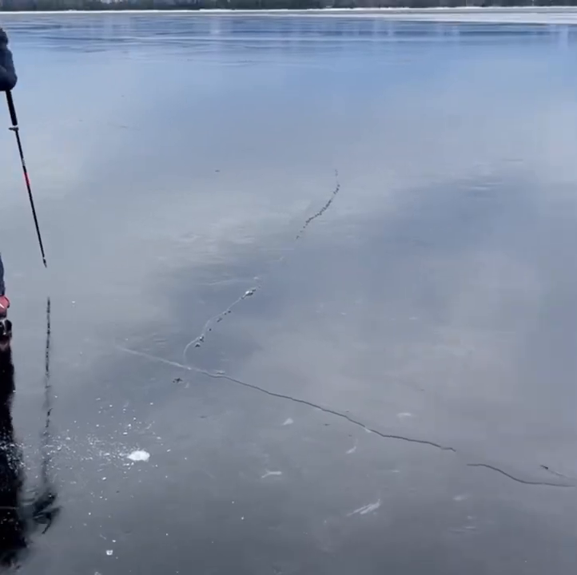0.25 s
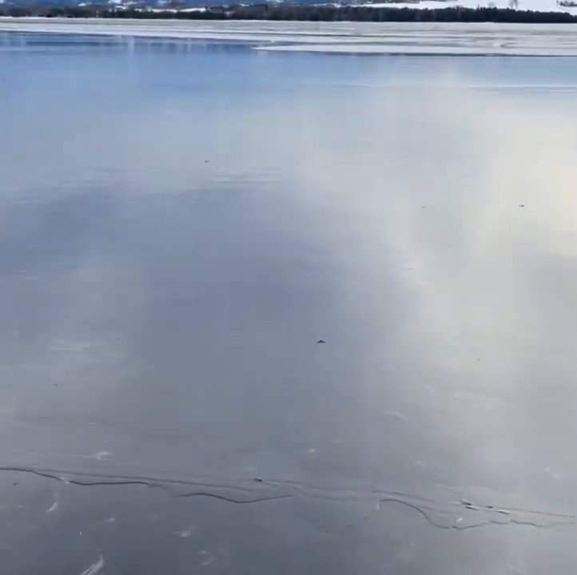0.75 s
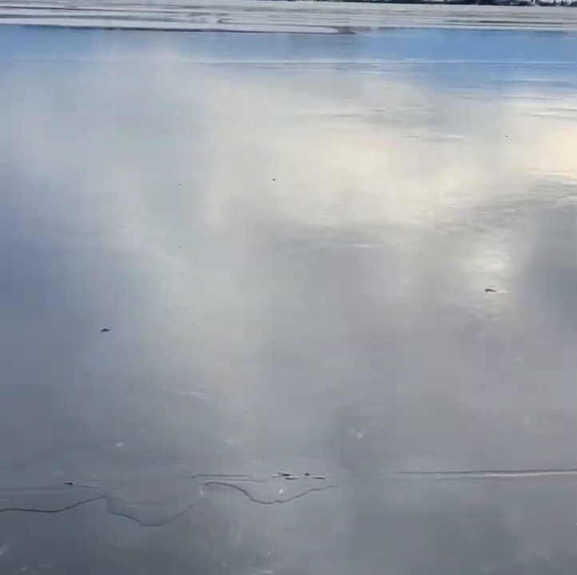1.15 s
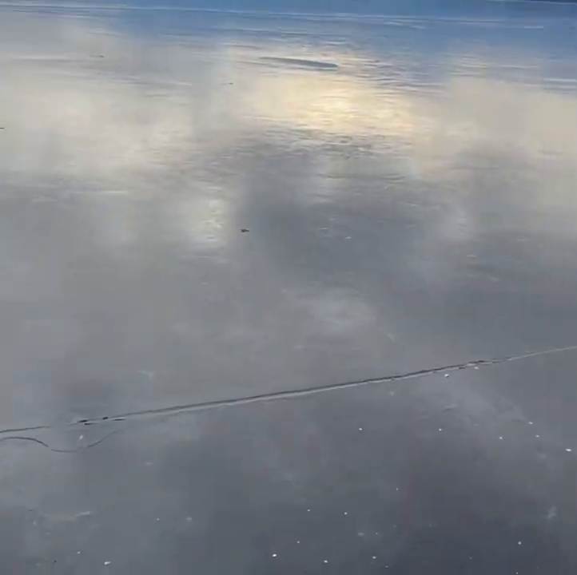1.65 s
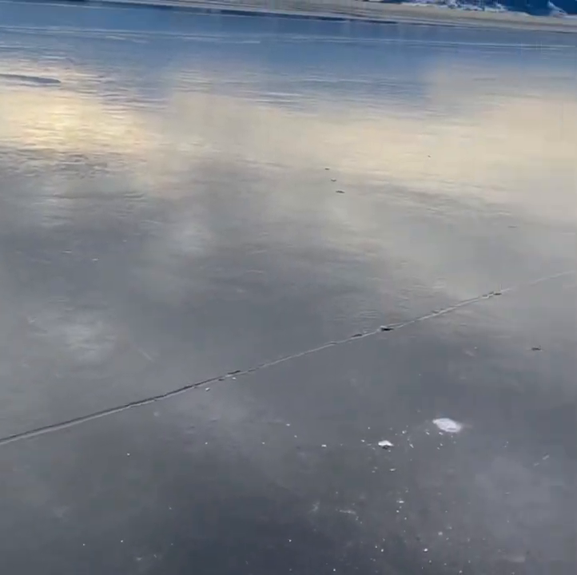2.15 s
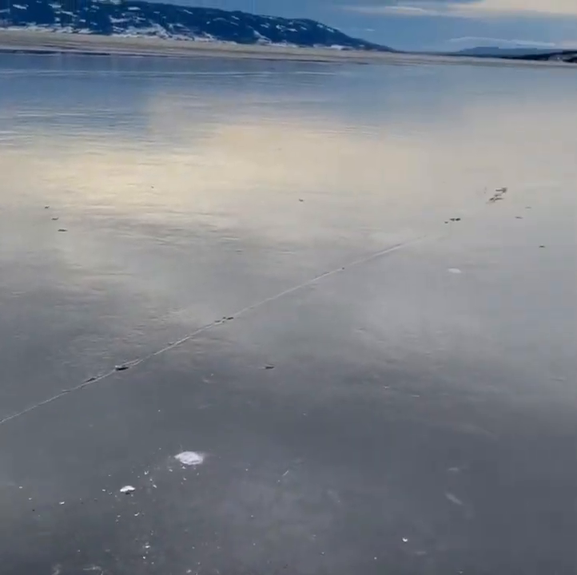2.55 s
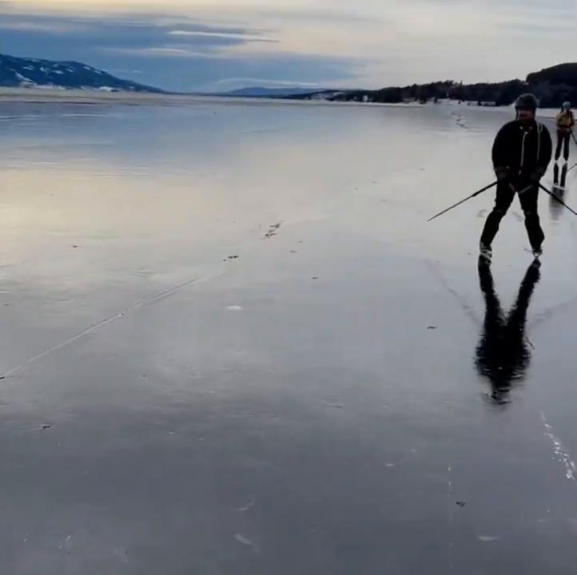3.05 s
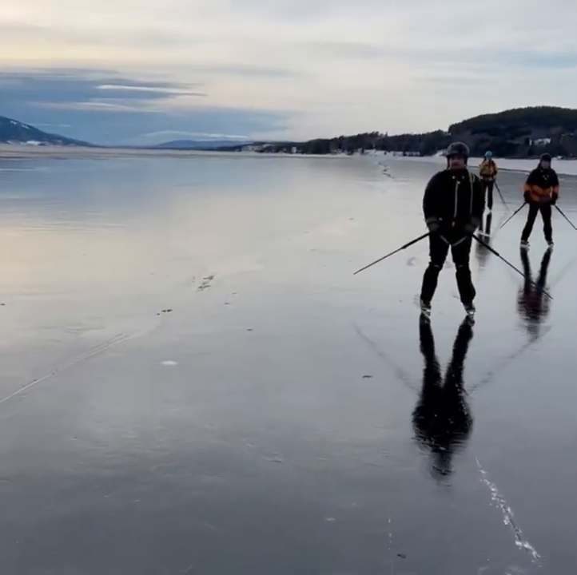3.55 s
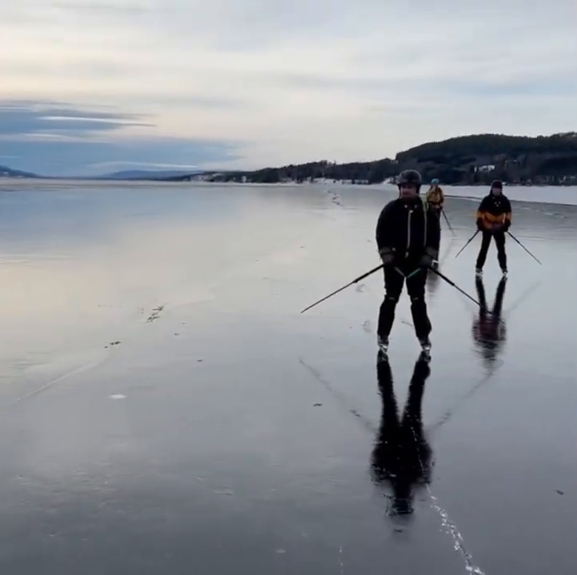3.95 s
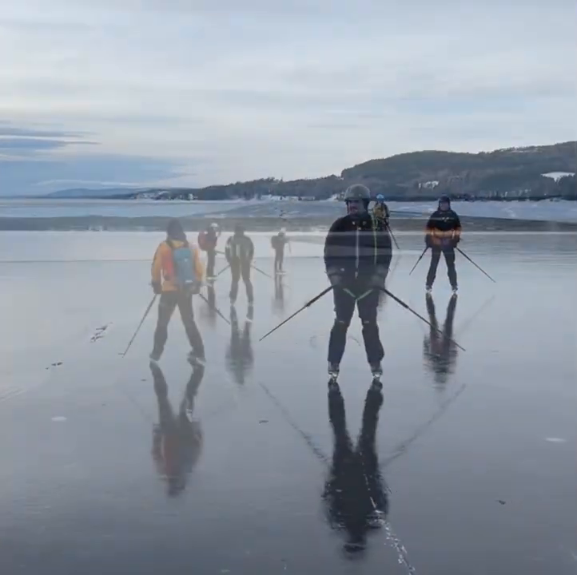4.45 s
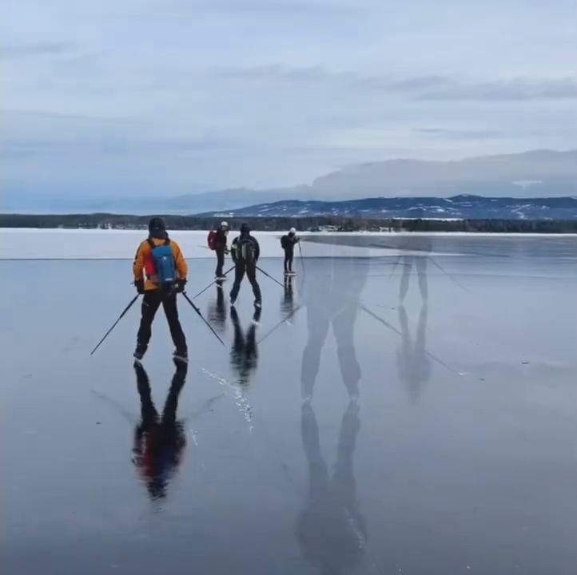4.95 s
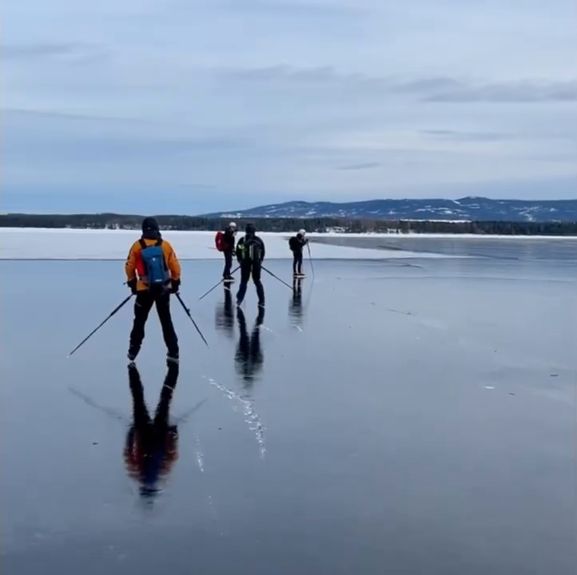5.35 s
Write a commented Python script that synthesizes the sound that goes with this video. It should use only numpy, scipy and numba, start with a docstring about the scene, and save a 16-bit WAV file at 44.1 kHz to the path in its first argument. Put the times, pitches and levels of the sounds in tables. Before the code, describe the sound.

Skates glide over a frozen lake, heard close and dry on a moving phone in open air. From the start a broad, grainy blade hiss sits over a low hum of the ice and soft wind booms around 60 Hz. A hard bright click with a dull knock lands at 0.28 s, smaller ticks at 0.6-0.9 s. Hiss brightens near 1.6 s as scuffs, crackles and a short sagging ring cluster, with a sharp tick at 1.7 s. At 1.91 s a loud crack snaps into a very fast falling chirp with a short crackly tail. A muted double knock follows at 2.35 s. The glide swells around 2.8-3.2 s with a wavering hollow moan near 900 Hz, then drops back and dulls. Wind gusts boom around 3.5-3.8 s; a faint click comes at 4.4 s. From there to 5.6 s, fluttering low thumps and deeper wind booms dominate a thin hiss.

```python
"""Wind booms while skate blades hiss and hum over lake ice; soon clicks and cracks cut through.
Noise in fixed and moving resonances makes the hiss, the humming ice sheet and a hollow moan.
Short noise bursts make the clicks, falling chirps the cracks, fading low tones the struck sheet.
Wind booms, buffets and pops on the two microphone ports of a phone carried along by a skater;
the phone's wind reduction makes the lows the same in both channels."""
import sys
import numpy as np
from scipy import signal
from scipy.io import wavfile
from scipy.ndimage import uniform_filter1d
from numba import njit

SR = 44100
rng = np.random.default_rng(int(sys.argv[2]) if len(sys.argv) > 2 else 0)


def transcribe(u):
    """Save the signal u as a 16-bit wav file named by the first command-line argument.

    u: samples, shape (n,) or (channels, n), limited to [-1, 1]; the rate is SR.
    q: integer samples, one column per channel.
    """
    v = np.clip(np.atleast_2d(u).T, -1, 1)
    q = np.round(v * 32767).astype(np.int16)
    wavfile.write(sys.argv[1], SR, q)


N = 246959
PORT_LAG_S = .00003  # the left port hears shared hiss and clicks this much late, to the nearest sample

# How hard the blades work the ice. Each row: time in seconds, glide hiss level in dB,
# extra brightness in dB, low drone level in dB, hum level of the ice sheet in dB.
BLADE_LEVELS = [(0, -50, -7, -57, -45.5), (.33, -56, 6.5, -55, -44.5), (.55, -51, 2.5, -54, -54),
                (.95, -51, 1, -50, -44), (1.4, -54, 4.5, -51, -47.5), (1.57, -49, 7, -54.5, -44.5),
                (1.73, -54, 5.5, -57, -44.5), (2.2, -56, 4.5, -54.5, -48), (2.55, -59.5, 6, -60, -47),
                (2.65, -54.5, 1, -53.5, -45.5), (2.76, -49.5, -0.5, -50.5, -54.5), (2.9, -51, -8, -54, -54),
                (3.04, -49, -4, -54.5, -59), (3.18, -51.5, -4, -56, -57.5), (3.3, -59, -4.5, -59, -53),
                (3.45, -61.5, -9, -60, -48.5), (3.7, -59, -13, -61, -47), (4.0, -55, -29, -60, -40.5),
                (4.2, -62, -26.5, -65.5, -46), (4.32, -60, -2.5, -57, -43), (4.55, -62, 4, -61, -48),
                (4.78, -56.5, -3, -59, -52.5), (5.05, -56.5, -3, -53, -46), (5.18, -57, -2.5, -52, -50),
                (5.3, -60, -3.5, -67.5, -49.5), (5.45, -59, -12.5, -63, -45), (5.6, -57.5, -14, -65, -37)]
# Below a moving edge the phone's wind reduction makes the lows the same in both channels;
# above it lies a hollow in the sound they share. Each row: time in seconds, edge in Hz,
# hollow depth (a share, before it wanders and is held to 0-1).
EDGE_AND_HOLLOW = [(0, 29.6, 0.03), (2.7, 30, 0.22), (2.93, 30, 0.03), (2.98, 30, 1.1), (3.04, 30, 1.1),
                   (3.06, 30, 0.55), (3.15, 30, .3), (3.38, 31.2, 0.13), (3.52, 59.6, 1), (3.68, 230, 0.5),
                   (3.82, 374, 0.85), (3.94, 490, 0.9), (4.12, 592, 0.05), (4.29, 600, 0), (4.31, 30, 0),
                   (5.6, 30, 0)]


def undb(db):
    """Turn a level in dB into a gain."""
    return 10 ** (np.asarray(db) / 20)


def unit(x):
    """Scale a signal to an rms of 1."""
    return x / np.sqrt(np.mean(x ** 2))


def curves(table):
    """Draw straight lines between the rows of a timed table, one curve per column."""
    s, *columns = np.array(table, float).T
    return [np.interp(np.arange(N) / SR, s, column) for column in columns]


@njit
def svf(x, hz, k):
    """Filter with a moving centre: band and high outputs; a smaller k is narrower."""
    band_out, high_out = np.empty(len(x)), np.empty(len(x))
    b, l = 0., 0.  # memory of the band and low parts
    for i in range(len(x)):
        g = np.tan(np.pi * hz[i] / SR)
        v = (b + g * (x[i] - l)) / (1 + g * (g + k))
        band_out[i] = k * v
        high_out[i] = x[i] - k * v - l - g * v
        b, l = 2 * v - b, l + 2 * g * v
    return band_out, high_out


def band(x, hz, width, order=2):
    """Keep a fixed band around hz, with its edges held in a safe range."""
    edges = [max(hz - width / 2, hz / 8), min(hz + width / 2, .45 * SR)]
    return signal.sosfilt(signal.butter(order, edges, "band", fs=SR, output="sos"), x)


def walk(rate):
    """Wander at random: rate levels per second, smoothed twice, rms 1."""
    k = int(SR / rate)
    steps = np.repeat(rng.standard_normal(N // k + 1), k)
    return unit(uniform_filter1d(uniform_filter1d(steps, k), k)[:N])


def fading(hits, t60):
    """Let every hit die away by 60 dB in t60 seconds."""
    return signal.lfilter([1], [1, -np.exp(-np.log(1000) / (t60 * SR))], hits)


def grains(rate, scatter_db, t60):
    """Envelope of random bursts of uneven size, each dying away."""
    hits = (rng.random(N) < rate / SR) * undb(scatter_db * rng.exponential(1, N))
    return fading(hits, t60)


def pair(hz, width, unalike):
    """Band noise at both ports: a shared part, and a part with opposite signs."""
    same, other = rng.standard_normal((2, N))
    late = np.roll(same, int(round(PORT_LAG_S * SR)))
    return band(np.array([late + unalike * other, same - unalike * other]), hz, width)


def drifting(x, share):
    """Let every pitch wander slowly by reading the sound at an uneven speed."""
    place = np.cumsum(1 + share * walk(7))
    return np.array([np.interp(place * (N - 1) / place[-1], np.arange(N), c) for c in x])


def add(out, s, x):
    """Mix a short sound in at s seconds."""
    i = int(s * SR)
    out[:, i:i + x.shape[-1]] += x[..., :N - i]


def rings(table, glide):
    """Damped tones whose pitch sags: rows of start in s, dB, Hz and t60 in s."""
    out, t = np.zeros((2, N)), np.arange(int(.25 * SR)) / SR
    for s, peak_db, hz, t60 in table:
        turns = hz * t * (1 - glide * np.minimum(t / t60, 1))
        shape = undb(peak_db - 60 * t / t60) * np.minimum(t / 0.0007, 1)
        add(out, s, shape * np.sin(2 * np.pi * turns))
    return out


def blades():
    """Grit under the steel excites resonances of ice and blade; each flickers a little."""
    # Resonances of the humming sheet. Each row: pitch in Hz, width in Hz, relative level in dB.
    hum_modes = [(233, 49, 1), (284, 97, 8), (340.4, 210, -7)]
    # Resonances of each hiss, low to high, then a narrow ring. Each row: pitch in Hz, width in Hz,
    # relative level in dB, how unlike the two ports are (0-1).
    drone_modes = [(900, 200, 0, .3), (1200, 280, 0, .3), (1420, 240, -4, .2)]
    glide_modes = [(1512, 530, -0.5, 0), (1905, 600, -.5, 0), (2358, 525, 1.5, 0.1), (2897, 480, -4.5, 1)]
    scrape_modes = [(3710, 770, -1.5, 0.23), (4634, 730, -3, 0.1425), (5390, 690, -3.5, 0.5),
                    (6010, 780, -1.5, 0.39), (7080, 2400, 0, 0.15)]
    sheen_modes = [(8110, 710, -11.5, 0.22), (9650, 1800, -3.5, 0.324), (10580, 1200, -5, 0.2),
                   (14800, 1800, -14.5, 0.36)]
    ring_modes = [(4204, 450, 0, 0.4)]
    # The narrow ring against the glide. Each row: time in seconds, relative level in dB.
    ring_level = [(0, -9), (.4, -8), (.8, -7), (1.1, -4.5), (1.4, -4.5), (2.3, -11.5), (2.7, -16),
                  (3.3, -16.5), (4.2, -24), (5.0, -21), (5.6, -22)]
    # Size of the slow pitch wander, a share each for drone, glide, scrape, sheen and ring.
    drifts = .04, .03, 0, 0, .025

    grit = 1 + 0.14 * uniform_filter1d(grains(300, 3.36, 0.0074), size=12)
    glide_db, bright_db, drone_db, hum_db = curves(BLADE_LEVELS)
    scrape_db = glide_db - 4 + 0.36 * bright_db  # follows only part of the brightness
    sheen_db = glide_db - 12.5 + bright_db
    ring_db = glide_db + curves(ring_level)[0]
    levels = drone_db, glide_db, scrape_db, sheen_db, ring_db
    mode_sets = drone_modes, glide_modes, scrape_modes, sheen_modes, ring_modes

    rub = rng.standard_normal(N)
    hum = sum(undb(db + 1.4 * walk(15)) * unit(band(rub, hz, width, order=1))
              for hz, width, db in hum_modes)
    out = undb(hum_db) * unit(band(hum, 268, 310))

    shared = walk(11)  # flicker common to every hiss
    for level_db, modes, drift in zip(levels, mode_sets, drifts):
        hiss = sum(undb(db + 0.67 * shared + 1.9 * walk(20)) * unit(pair(hz, width, unalike))
                   for hz, width, db, unalike in modes)
        if drift:
            hiss = drifting(hiss, drift)
        out = out + undb(level_db) * unit(grit * hiss)
    return out


def faint_tones():
    """Short faint tones at random, slightly sliding pitches give the hiss a grainy, whistling texture."""
    out, t = np.zeros((2, N)), np.arange(int(.1 * SR)) / SR
    drone_db = curves(BLADE_LEVELS)[2]
    per_second = 110
    for when, pitch, size, length, slide, pan in rng.random((int(per_second * N / SR), 6)):
        span = .014 * (.5 + 1.3 * length)  # seconds
        start_hz = 600.5 * 2 ** (3.6 * pitch)  # scattered over 3.6 octaves
        hz = start_hz * (1 + .03 * (2 * slide - 1) * t / span)
        db = drone_db[int(when * N)] + 2.5 - 12 * size - 9 * pitch  # high ones are weaker
        tone = t / span * np.exp(1 - t / span) ** 2 * np.sin(2 * np.pi * np.cumsum(hz) / SR)
        side_db = np.array([[3], [-3]]) * (2 * pan - 0.5)  # leans left more often than right
        add(out, when * N / SR, undb(db + side_db) * tone)
    return out


def moan():
    """Rubbing noise in a narrow blade resonance gives a hollow moan whose pitch wavers."""
    # Each row: time in seconds, pitch in Hz before it wavers, level in dB.
    moan_path = [(2.6, 880, -66), (2.69, 930, -56), (2.738, 860, -49), (2.762, 960, -56), (2.79, 965, -51),
                 (2.848, 940, -53), (2.876, 890, -46), (2.914, 940, -53), (3.055, 865, -58),
                 (3.096, 868, -43), (3.116, 862, -52), (3.14, 860, -44), (3.165, 835, -43),
                 (3.188, 844, -57), (3.214, 818, -55), (3.288, 820, -78)]
    hz, db = curves(moan_path)
    hz = hz * (1 + .025 * walk(20))
    width = .16  # share of the pitch, for each of two passes

    def resonant():
        once = svf(rng.standard_normal(N), hz, width)[0]
        return unit(svf(once, hz, width)[0])

    same, other = resonant(), resonant()
    strength = np.sqrt(uniform_filter1d(same ** 2, size=500))
    same = unit(same / strength ** .6)  # fairly even strength
    return undb(db) * (same + .2 * other * np.array([[1], [-1]]))


def clicks():
    """Lumpy noise bursts, each with a bright part and a duller body."""
    # Clicks and scuffs of steel on ice, and the bright snap and crackles of the crack near 1.91 s.
    # Each row: start in seconds, rough treble peak in dB, treble centre in Hz, rough body peak in dB,
    # left minus right in dB, length before the fade in seconds.
    click_list = [(0.278, -24.5, 3970, -35, 3, 0.0042), (0.2843, -5.5, 7150, -14.5, 1, 0.0075),
                  (0.455, -33, 6040, -40.5, 1.5, .09), (0.469, -32, 4500, -55, 7, .0024),
                  (0.605, -11.5, 7700, -35, 1, 0.0021), (0.641, -17, 7150, -55, 5, 0.00095),
                  (.735, -29, 11100, -55, -2, 0.0021), (.759, -31, 11000, -55, 0, .002),
                  (0.7965, -34, 6600, -38, 0, 0.0047), (.819, -21.5, 5600, -24, -3, 0.0034),
                  (.8916, -25.5, 10400, -37, -2, 0.0052), (1.084, -35, 5560, -41, 0, 0.0065),
                  (1.375, -37, 5500, -58, -2, 0.065), (1.429, -35, 8900, -40, 1, .0044),
                  (1.4543, -32, 7900, -38, 0, 0.004), (1.4955, -31, 1350, -44, 0, .003),
                  (1.539, -33, 2000, -42, 0, .002), (1.512, -36.5, 8200, -53, -1, 0.11),
                  (1.582, -23.5, 9200, -33, 3, 0.011), (1.596, -31, 7100, -35, 1, 0.052),
                  (1.599, -31, 2050, -49, -5, 0.03), (1.61, -33, 6000, -36, -7, 0.0046),
                  (1.643, -29, 2200, -46, 2, .003), (1.632, -29, 2700, -46, 0, .002),
                  (1.654, -29, 2200, -46, 0, .004), (1.664, -25, 2400, -46, -1, .003),
                  (1.7055, -14, 10400, -21.5, -1, 0.0024), (1.711, -39, 2200, -30.5, -1, 0.0074),
                  (1.772, -23.5, 4900, -31, -.5, 0.0074), (1.9083, -13, 6200, -45, 1, 0.002),
                  (1.914, -28, 7200, -56, 0, 0.016), (1.9165, -19, 2600, -45, -2, .0012),
                  (1.9235, -21, 2900, -45, 2, .0015), (1.9295, -25, 2500, -45, -1, .0015),
                  (2.074, -35, 4600, -41, -10, 0.0053), (2.186, -44, 4600, -53, -9, 0.017),
                  (3.988, -55.5, 7900, -45, -1.5, 0.013), (4.4185, -33, 4000, -42, 3, 0.003),
                  (4.42, -40, 4400, -47, 5, 0.024), (4.433, -50, 4400, -39, 3, .005)]
    out, t = np.zeros((2, N)), np.arange(int(.15 * SR)) / SR
    lag = int(round(PORT_LAG_S * SR))
    bright_crest_db, body_crest_db = 13.5, 9.5  # assumed peak over rms
    for s, peak_db, hz, body_db, pan_db, length in click_list:
        t60 = min(0.0091 + 3.5 * length, 0.13)  # seconds; long bursts fade more slowly
        same, left, right, low, crumb = rng.standard_normal((5, len(t)))
        fine_db = 2.12 * unit(uniform_filter1d(crumb, size=80))
        lumps_db = 3 * min(length / .04, 1) * unit(uniform_filter1d(crumb[::-1], size=400))
        swell = np.minimum(t / max(0.0023, .4 * length), 1)
        fade = undb(-60 * np.maximum(t - length, 0) / t60)
        shape = undb(fine_db + lumps_db) * swell * fade

        apart = np.array([left, right])
        width = hz * (0.82 if hz > 4480 else .3)  # lower bursts ring in a narrower band
        bright = unit(band(np.array([np.roll(same, lag), same]) + .6 * apart, hz, width))
        body = unit(band(low + 0.36 * apart, 1000, 2100))
        burst = undb(peak_db - bright_crest_db) * bright + undb(body_db - body_crest_db) * body
        side = undb(np.array([[pan_db], [-pan_db]]) / 2)
        add(out, s, side * shape * burst)
    return out


def crack():
    """Bending waves spread a snap into a falling chirp; scattered waves trail it."""
    # Each row: start in seconds, chirp peak in dB, start pitch in Hz, end pitch in Hz,
    # tail level in dB, time for the tail to fall 60 dB in seconds.
    crack_list = [(1.9089, -2.5, 3150, 700, -24, .07), (.8192, -28, 3600, 1300, -39, .03),
                  (1.5868, -27, 2300, 600, -42, .03)]
    out, t = np.zeros((2, N)), np.arange(int(.2 * SR)) / SR
    sweep_s, swell_s = .0016, .001
    for s, peak_db, start_hz, end_hz, tail_db, t60 in crack_list:
        hz = end_hz + (start_hz - end_hz) * np.exp(-t / sweep_s)
        swell = (t / swell_s * np.exp(1 - t / swell_s)) ** 3
        chirp = swell * np.sin(2 * np.pi * np.cumsum(hz) / SR)
        chirp = np.array([chirp, np.roll(chirp, shift=2)])  # it reaches the left port first

        same, other, crumb = rng.standard_normal((3, len(t)))
        crackle = undb(4 * unit(uniform_filter1d(crumb, size=100)))
        scattered = np.array([same + 0.2 * other, same - 0.33 * other]) * crackle
        tail = unit(band(scattered, 2330, 2200))
        fade = undb(tail_db - 60 * t / t60) * np.minimum(t / 0.00088, 1)
        add(out, s, undb(peak_db) * chirp + fade * tail)
    return out


def blows():
    """Blows ring the same modes of the ice sheet, most near a favoured pitch."""
    # Ways the sheet can ring. Each row: start pitch in Hz, relative level in dB, t60 in seconds.
    sheet_modes = [(164, 0, .06), (253.3, 0.5, 0.11), (376, 0, 0.045), (511, -0.5, 0.052), (692, -6, 0.14),
                   (837, -3, 0.053), (1013, 4.5, 0.011), (1232, 2, 0.032)]
    # Blows on the sheet; the close rows after 1.59 s sustain one sagging ring.
    # Each row: start in seconds, level in dB before the mode's own, pitch that rings most in Hz.
    blow_list = [(0.294, -20.5, 370), (0.296, -30, 169), (1.91, -32.5, 170), (1.5879, -32, 480),
                 (1.5895, -24, 262), (1.5975, -34, 255), (1.6355, -32, 225), (1.604, -26.5, 250),
                 (1.612, -30, 252), (1.627, -32, 225), (1.608, -30.5, 510), (1.9108, -16.5, 905),
                 (1.916, -27, 276), (1.919, -24.5, 1240), (2.328, -35, 252), (2.36, -25, 766),
                 (2.3624, -25, 420), (2.371, -25.5, 466), (2.386, -34, 256)]
    struck = []
    for s, peak_db, near_hz in blow_list:
        for hz, db, t60 in sheet_modes:
            away_db = 33.5 * abs(np.log2(hz / near_hz))  # 33.5 dB weaker per octave away
            struck.append((s, peak_db + db - away_db, hz, t60))
    return rings(struck, glide=0.067)


def wind():
    """Eddies boom on both ports alike; buffets and pops push the two opposite ways."""
    # Wind common to both ports. Each row: time in seconds, boom between gusts in dB,
    # boom pitch in Hz, rustle in dB.
    shared_wind = [(0, -41.5, 59.6, -53), (.9, -53.5, 63.4, -54), (1.45, -51, 65.2, -51),
                   (1.6, -60, 66.2, -54.5), (2.0, -48, 60, -53.5), (2.55, -62, 54.9, -51),
                   (2.75, -50.5, 56.4, -54.5), (3.1, -52.5, 58.7, -58.5), (3.45, -43, 59.7, -61),
                   (3.75, -40, 62, -64), (4.15, -46, 60, -53.5), (4.65, -46, 78, -54),
                   (4.82, -34.5, 83.6, -53.5), (5.05, -35, 83.8, -50), (5.4, -32.5, 79.5, -59.5),
                   (5.6, -32, 79.4, -50)]
    # Wind that differs between the ports, before lulls and filtering. Each row: time in seconds,
    # low buffet in dB, high buffet in dB, pops in dB.
    apart_levels = [(0, -43.5, -56, -56), (.35, -45.5, -64, -62), (.7, -40, -47, -58),
                    (1.1, -44.5, -54.5, -66), (1.7, -51.5, -64, -56), (2.3, -48.5, -57, -63),
                    (2.8, -45.5, -42, -77), (3.3, -45, -42, -68), (3.6, -66, -52, -53.5),
                    (4.0, -67, -62, -49.5), (4.4, -74, -73.5, -61.5), (4.85, -46, -61, -59),
                    (5.2, -59.5, -70, -60), (5.6, -45, -45, -65)]
    # Strong eddies that thump both ports. Each row: start in seconds, tone level in dB, start pitch in Hz.
    thump_list = [(4.425, -29.5, 458), (4.517, -41, 390), (4.599, -27, 366), (4.627, -32, 463),
                  (4.701, -32, 398), (4.735, -38, 331), (4.859, -30, 336), (4.895, -27.5, 420),
                  (4.907, -34, 746), (4.935, -26.5, 447), (4.982, -36, 416), (4.995, -30.5, 382),
                  (5.02, -36, 331), (5.053, -32, 464), (5.071, -35, 331), (5.085, -32, 425),
                  (5.095, -33, 404), (5.127, -38, 799), (5.178, -44, 331), (5.199, -30.5, 360),
                  (5.266, -35, 427), (5.321, -44, 342), (5.35, -34, 369), (5.405, -38, 331),
                  (5.451, -30, 331), (5.484, -27.5, 331), (5.509, -42, 331), (5.534, -33, 330),
                  (5.561, -27, 331), (5.584, -27, 523)]

    calm_db, boom_hz, rustle_db = curves(shared_wind)
    low_db, high_db, pops_db = curves(apart_levels)
    edge_hz = curves(EDGE_AND_HOLLOW)[0]
    noise = rng.standard_normal((4, N))
    rustle = unit(undb(1.2 * walk(25)) * band(noise[1], 540, 360))

    eddies = shedding(27, 0.06)
    low = unit((1.7 + eddies) * band(noise[2], 94, 100))
    high = unit((.9 + eddies) * band(noise[2], 254, 220))
    pops = unit((.25 + eddies) * band(noise[3], 820, 770, order=3))
    lulls = undb(2.5 * walk(9))
    apart = lulls * (undb(low_db) * low + undb(high_db) * high) + undb(pops_db) * pops
    for _ in range(6):  # the phone's wind reduction: little difference is left below the edge
        apart = svf(apart, edge_hz, np.sqrt(2))[1]

    thumps = rings([(s, db, hz, .03) for s, db, hz in thump_list], glide=0.31)
    thumps = thumps + 1.16 * band(thumps * noise[0], 430, 740)  # roughened by noise
    alike = gusts(calm_db) * booming(boom_hz) + undb(rustle_db) * rustle + thumps
    return alike + apart * np.array([[1], [-1]])


def shedding(rate, t60):
    """Envelope of eddies shed at a loosely steady rate per second."""
    turns = np.floor(np.cumsum(rate * (1 + .35 * walk(25))) / SR)
    hits = (np.diff(turns, prepend=0) > 0) * undb(3.4 * rng.standard_normal(N))
    return unit(uniform_filter1d(fading(hits, t60), size=130))


def booming(hz):
    """Big eddies swing the pressure at a wandering pitch, with fairly even strength."""
    swing = svf(svf(rng.standard_normal(N), hz, 0.92)[0], hz, 0.92)[0]
    strength = np.sqrt(uniform_filter1d(swing ** 2, size=1800))
    return unit(band(swing / strength ** 0.76, 74, 190, order=2))


def gusts(calm_db):
    """Gain of the boom: a wandering base, and a swell for each gust."""
    # Single gusts. Each row: time of the peak in seconds, peak in dB before the base joins it.
    gust_list = [(.08, -37), (.2, -38.5), (.3, -43), (.5, -39), (.565, -34.5), (.67, -40), (.73, -42),
                 (1.07, -33.5), (1.18, -37.5), (1.31, -50), (1.42, -42.5), (1.79, -49), (2.17, -42.5),
                 (3.2, -39.5), (3.351, -42), (3.5, -33.5), (3.58, -32), (3.731, -27), (3.79, -35.5),
                 (3.98, -35), (4.329, -42), (4.43, -40), (4.54, -32.5), (4.621, -34.5), (4.885, -31),
                 (5.105, -28), (5.17, -32), (5.33, -41), (5.45, -33), (5.56, -31.5)]
    rise_s, fall_s = 0.028, 0.0088
    t, gain = np.arange(N) / SR, undb(calm_db + walk(12))
    for s, peak_db in gust_list:
        swell = np.exp(-((t - s) / np.where(t < s, rise_s, fall_s)) ** 2)
        gain = np.hypot(gain, undb(peak_db) * swell)
    return gain


def hollowed(x):
    """Take a moving, patchy band out of what both channels share."""
    edge_hz, depth = curves(EDGE_AND_HOLLOW)
    hz = (520 + edge_hz) * (1 + 0.056 * walk(25))
    depth = np.clip(depth * (1 + .45 * walk(35)), 0, 1)
    mid, side = (x[0] + x[1]) / 2, (x[0] - x[1]) / 2
    for _ in range(2):
        mid = mid - depth * svf(mid, hz, .55)[0]
    return np.array([mid + side, mid - side])


def scene():
    """Blades, clicks, blows and wind in open air with no walls."""
    return hollowed(blades() + faint_tones() + wind()) + moan() + clicks() + blows() + crack()


def record(dry):
    """The phone steeply cuts the treble above 16300 Hz."""
    return signal.sosfilt(signal.ellip(10, .2, 80, 16300, fs=SR, output="sos"), dry)


dry = scene()
out = record(dry)
transcribe(out)
```